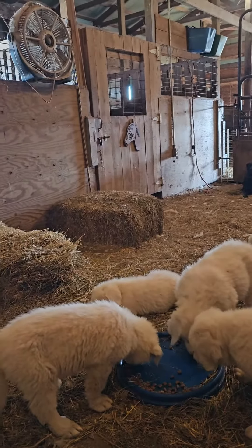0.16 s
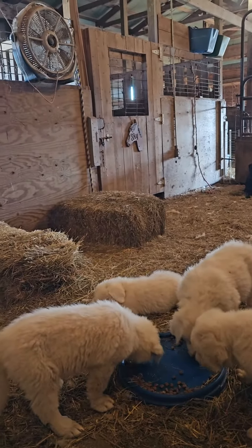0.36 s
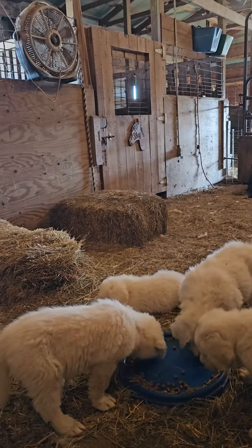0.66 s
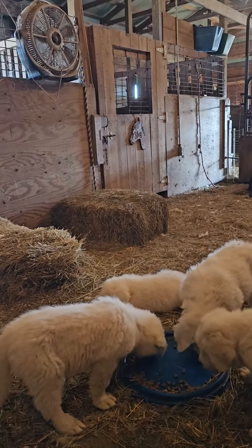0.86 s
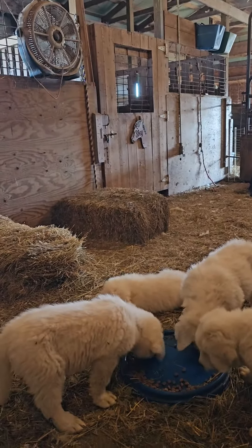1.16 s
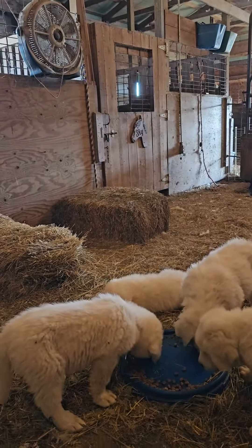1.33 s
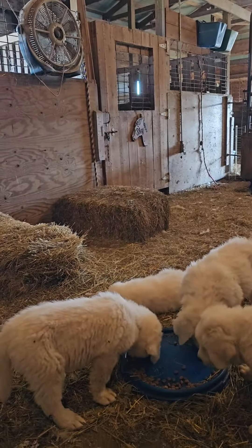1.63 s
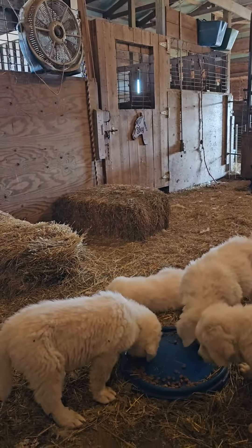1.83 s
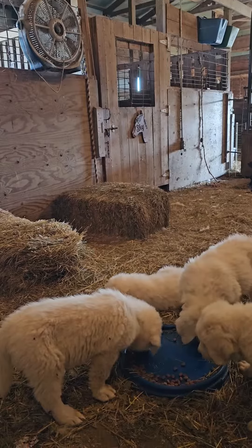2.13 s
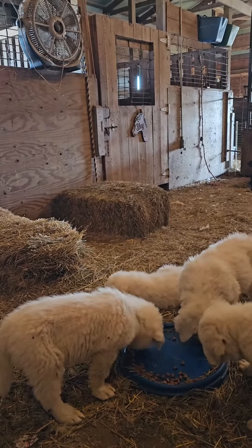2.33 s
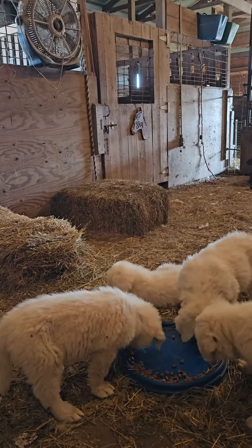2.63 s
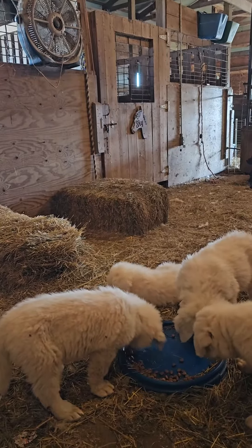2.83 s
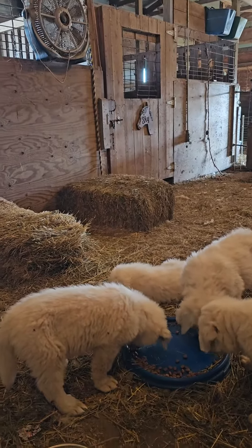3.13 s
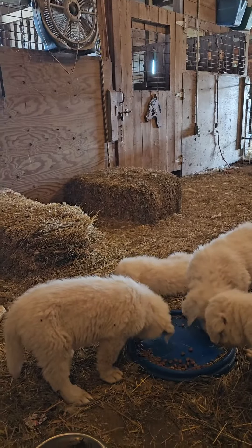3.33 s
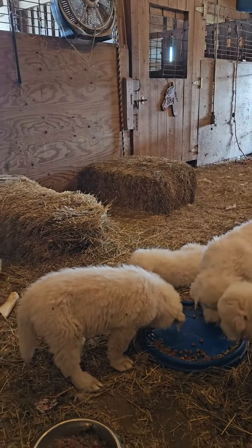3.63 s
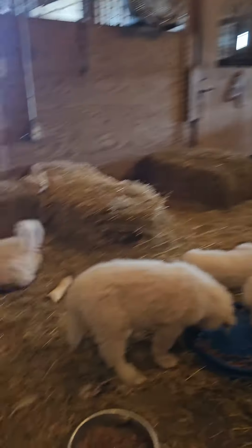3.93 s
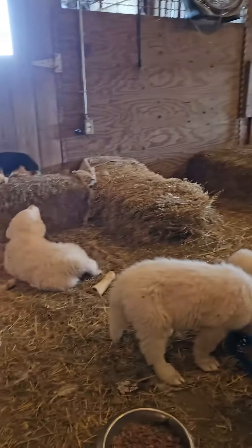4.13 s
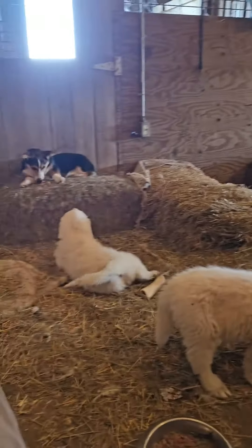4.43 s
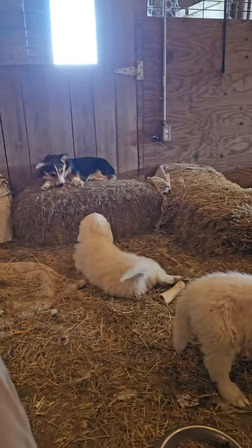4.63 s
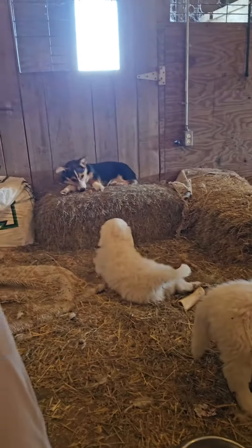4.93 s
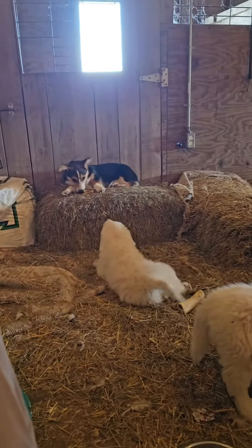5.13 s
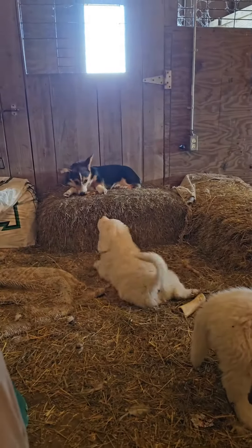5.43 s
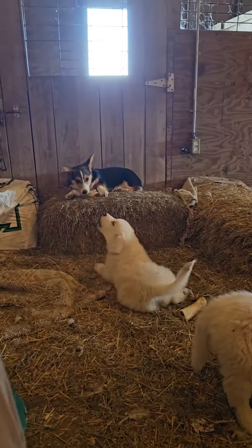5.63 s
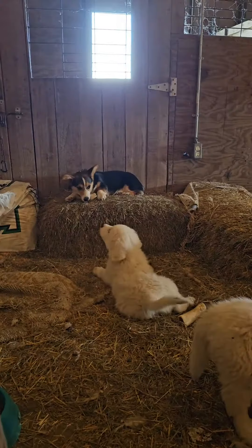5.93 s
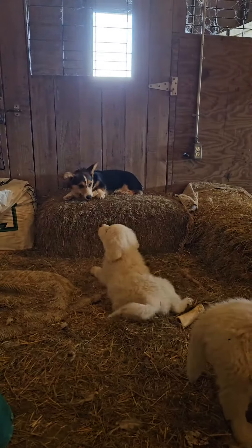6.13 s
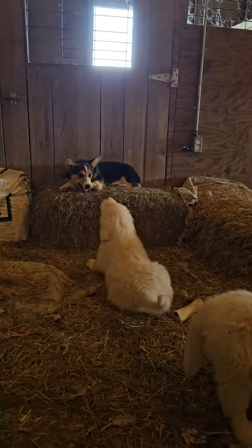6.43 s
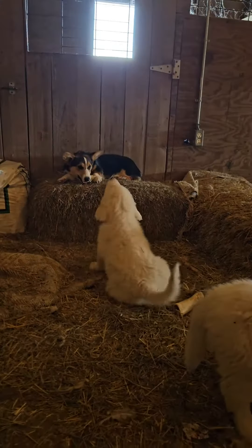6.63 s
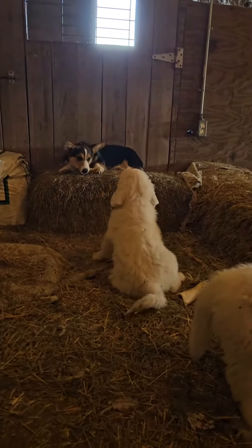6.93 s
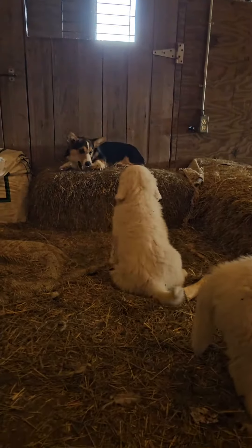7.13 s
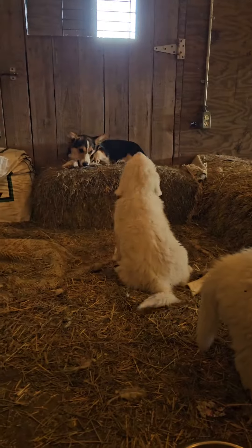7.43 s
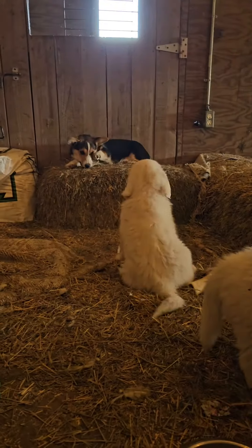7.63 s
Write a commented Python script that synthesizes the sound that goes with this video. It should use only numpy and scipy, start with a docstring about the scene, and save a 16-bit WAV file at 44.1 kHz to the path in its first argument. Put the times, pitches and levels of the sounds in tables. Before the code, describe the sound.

Inside a wooden barn, quiet low rumble and hiss with soft straw rustling and kibble ticking in a plastic pan. A puppy gives two weak, hoarse barks with little grunts, then a low growl and a slower grumble. Later it yaps loudly: a quick pair, another quick pair, then a single last yap. Handheld microphone near the feeding pups, the barking puppy across the pen, with short woody echoes.

```python
"""A puppy in a wooden barn gives two hoarse barks, grunts and growls, then yaps five times at a dog on a hay bale.
Each bark is an arch of pitch: harmonics and breathy air, with strong-weak beats of the folds near the top.
Grunts and growls are uneven pulse trains through chest, throat and mouth.
Litter mates' kibble rings a plastic pan; soft low bumps, scuffs and rustling straw are filtered noise.
Scattered echoes give the barn, over a low rumble and hiss, with a brief extra rumble near the start."""
import sys
import numpy as np
from scipy import signal
from scipy.fft import rfft, irfft, next_fast_len
from scipy.io import wavfile
from scipy.ndimage import uniform_filter1d, minimum_filter1d

SR = 44100
rng = np.random.default_rng(int(sys.argv[2]) if len(sys.argv) > 2 else 0)


def store_pcm(level_fs):
    """Save levels as 16-bit WAV."""
    pcm = np.round(np.clip(level_fs, -1, 1) * 32767).astype(np.int16)
    wavfile.write(sys.argv[1], SR, np.atleast_2d(pcm).T)


N = 342657
TIME = np.arange(N) / SR

# Hoarse barks: (top of arch [s], rise [s], fall [s], top pitch [Hz], level [dB], jaw gape [dB],
# jaws part before top [s], folds break at [s], beating width [s], beat strength [dB],
# change of fundamental in the break [dB], period jitter at 800 Hz [fraction], left minus right [dB])
HOARSE_BARK_EVENTS = [ (1.238, .09, 0.053, 636, -30, 5, 0.071, 1.19, 0.032, -6, -8.5, 0.00776, 1),
                      (2.284, .074, 0.081, 561.3, -32, 2.5, 0.044, 2.255, .07, -2.5, 7.5, 0.00814, 2)]
# Yaps: (top of arch [s], rise [s], fall [s], top pitch [Hz], level [dB], jaw gape [dB],
# jaws part before top [s], folds break at [s], beating width [s], beat strength [dB],
# change of fundamental in the break [dB], period jitter at 800 Hz [fraction], left minus right [dB])
YAP_EVENTS = [ (5.355, .099, .07, 856, -16, 14.5, 0.095, 5.354, 0.027, -1.5, -7.5, 0.0067, 1),
              (5.702, 0.094, .1, 818.3, -15.5, 8.5, 0.075, 5.699, 0.081, -3, 2.5, 0.0054, .3),
              (6.488, .1, .085, 779.2, -18.5, 12, 0.098, 6.486, .03, -4.5, -13.5, .011, -.9),
              (6.759, .083, .12, 828.3, -18.5, 5.5, 0.089, 6.748, 0.058, 6, 1.5, 0.0056, -0.5),
              (7.455, .09, .08, 863, -14.5, 7, 0.088, 7.46, 0.032, -2, -10, .004, -.3)]
# Throat colour of each hoarse bark, one curve per bark: (frequency [Hz], level [dB])
HOARSE_THROAT_CURVES = [
    [(70, -26), (150, 1.5), (550, 0.5), (800, 5), (1280, 2), (1480, -25), (1900, -6.5), (2100, -10.5),
     (3050, -8.5), (4400, -29), (5900, -56), (8300, -44.5), (10000, -53), (12500, -39), (15500, -73)],
    [(70, -35), (150, 5), (550, -7), (880, 3), (1280, -6), (1500, -4.5), (1920, 3.5), (2700, -4.5),
     (3200, -8.5), (4200, -18.5), (5900, -48.5), (8300, -37.5), (10000, -52), (12500, -22.5), (15500, -62)],
]
# Rounder throat colour shared by the yaps: (frequency [Hz], level [dB])
YAP_THROAT_CURVE = [(70, -33.5), (180, 0.5), (450, -7.5), (620, -6), (790, 2.5), (1020, -17), (1250, -6),
                    (1650, -10.5), (2250, -15), (2900, -30), (4000, -39.5), (6000, -63.5), (8000, -51),
                    (10000, -60.5), (12200, -47), (15500, -81)]
# Voice settings by name: swell [power of arch], *_db [dB], *_s [s], flutter [share], rasp_slope_db [dB]
HOARSE_SETTINGS = dict(swell=1, surge_db=0, shut_db=-24, lead_s=0.024, opening_s=0.1, closing_s=0.069, lips_db=3.5, flutter=0.44, rasp_db=-5.5, rasp_slope_db=-1)
YAP_SETTINGS = dict(swell=1.536, surge_db=10.5, shut_db=-19.5, lead_s=0.057, opening_s=0.059, closing_s=0.05, lips_db=3, flutter=0.2, rasp_db=-25, rasp_slope_db=15)
# Lines between the harmonics: (multiple of the pitch [ratio], level [dB])
HALF_LINE_LEVELS = [(1.5, 9), (2.5, 7.5), (5.5, -3)]
# How much of the jaw movement reaches each overtone: (frequency [Hz], share [0-1])
JAW_SHARE_CURVE = [(1250, 0.16), (1550, 0.6), (2300, 1), (4500, 0.7), (7000, 0.11)]
# Growls and grunts: (start [s], length [s], attack [s], level [dB], pulse rate [1/s], unevenness [0-1],
# first mouth resonance [Hz], closed mouth resonance [Hz], mouth relative level [dB])
GROWL_EVENTS = [ (1.08, 0.063, 0.042, -37, 160, 0.19, 1000, 1000, -20),
                (1.515, 0.044, 0.0084, -41.5, 156, 0.18, 1170, 1090, -21),
                (1.589, 0.1, 0.01, -35.5, 155, .08, 1020, 1010, -25),
                (2.209, 0.047, 0.011, -41, 150, 0.17, 940, 950, 13.5),
                (2.775, 0.27, 0.1, -26.5, 122, .19, 1260, 710, -10),
                (3.035, .24, 0.027, -34.5, 40, .2, 720, 750, -24),
                (3.766, 0.365, .065, -31, 84, .09, 1194, 865, -12),
                (5.497, 0.14, 0.018, -36.5, 174, 0.12, 806, 848, -32),
                (6.59, 0.078, .02, -42, 160, 0.17, 820, 800, -17)]
# Chest boom of the growls: (frequency [Hz], level [dB])
CHEST_CURVE = [(60, -24.5), (100, -23.5), (125, 3.5), (155, -1.5), (200, -4), (255, -9), (340, -10),
               (480, -16.5), (620, -25), (1000, -31), (2000, -36), (4000, -41), (8000, -51.5)]
# Kibble knocks: (time [s], level before KIBBLE_LIFT_DB [dB], favoured mode before detuning [Hz])
KIBBLE_EVENTS = [(1.454, -44, 1270), (1.496, -40, 1080), (1.527, -42, 1100), (2.056, -40.5, 1040),
                 (2.182, -45, 880), (3.288, -37, 853), (3.33, -32, 1416), (3.546, -39.5, 1290),
                 (3.643, -46, 1480), (3.663, -38, 810), (4.481, -44.5, 900)]
# Plastic pan: (mode before detuning [Hz], level before the spot boost [dB], 60 dB decay [s])
PAN_MODE_TABLE = [(640, -0.5, 0.026), (917, 3.5, 0.045), (1140, 3.5, 0.031), (1505, -3.5, 0.066),
                  (1690, -2, 0.065), (3220, -4, 0.013)]
# Soft low bumps; from the third on they are paws landing: (time [s], dry peak level [dB])
BUMP_EVENTS = [(.292, -44), (.521, -49), (2.7, -45), (3.71, -44), (6.085, -43), (6.1, -44), (6.547, -22),
               (6.935, -34), (7.138, -42)]
# Paw scuffs: (time [s], length [s], dry level [dB], centre frequency [Hz])
SCUFF_EVENTS = [(5.023, 0.055, -47.5, 3410)]
# Straws snapping close by: (time [s], dry peak level [dB])
SNAP_EVENTS = [(3.541, -43), (3.584, -35.5), (5.8596, -44.5), (6.0018, -44.5), (6.037, -45), (6.071, -38.5),
               (6.3577, -36)]
# Snap colour: (frequency [Hz], level [dB])
SNAP_CURVE = [(200, -3.5), (1500, 3), (5500, -1), (7000, -20.5), (10000, -36), (15000, -25.5)]
# Puppies shifting in the straw: (loudest at [s], swell [s], fade [s], level before the overall lift [dB],
# fizz relative to body [dB], left minus right [dB])
RUSTLE_EVENTS = [ (.11, 0.076, 0.069, -53, -1, -3), (.38, 0.2, 0.27, -62, 0, -1),
                 (1.68, 0.17, 0.092, -57.5, 3, -0.5), (2.079, .06, 0.2, -61, 6, -3),
                 (2.89, 0.068, 0.087, -52, 1, 0), (3.28, 0.13, 0.2, -62.5, 8, -6.5),
                 (3.982, 0.2, 0.15, -48, -2.5, -5), (4.3, 0.073, 0.11, -56.5, 9.5, -4),
                 (4.76, 0.15, 0.12, -44.5, -7, -7.5), (5.198, 0.28, .2, -50, -7, 0),
                 (6.112, 0.016, .04, -59, -3, -10), (7.169, 0.33, 0.33, -51.5, -4, -7.5)]
# Straw colour: (frequency [Hz], level [dB])
STRAW_CURVE = [(180, -32.5), (300, -5.5), (535, 0), (821, -0.5), (1090, -3), (1200, 1), (1670, -5),
               (1910, -3), (4070, -1.5), (7370, -19), (9290, -34.5), (11700, -19.5), (15500, -34)]
# Background colour: (frequency [Hz], level [dB])
FLOOR_CURVE = [(15, -32), (25, -11.5), (71, -3.5), (359, -13), (410, -27.5), (523, -19.5), (567, -18),
               (631, -19.5), (2010, -26.5), (7500, -43), (9300, -59.5), (15500, -38)]
# Barn echo decay: (frequency [Hz], 60 dB decay [s])
BARN_DECAY = [(150, 0.3), (400, 0.63), (800, 0.51), (1300, 0.41), (2800, 0.41), (7300, 0.42)]

EDGE_HZ = 15700  # top of the audible band
SLACK_HZ = 151.4  # pitch of the folds at rest
BREAK_S = 0.0016  # how fast the folds slip into strong-weak beats
SURGE_LEAD_S, SURGE_S = 0.024, 0.021  # the fundamental surges ahead of the break
PARTING_S, MUFFLED_DB = 0.0077, -20.5  # how fast the jaws part, and how dull the voice is until then
LIPS_SHUT_HZ, LIPS_OPEN_HZ, LIPS_WIDTH_HZ = 810, 1310, 150
GROWL_ONSET_DB, GROWL_SAG_DB_PER_S = -10.5, -18  # a growl swells from here, then sags
MOUTH_CLOSES_AFTER_S, MOUTH_CLOSING_S = 0.092, 0.011
MOUTH_WIDTHS_HZ = 280, 600
GROWL_LOW_CUT_HZ = 120
KIBBLE_LIFT_DB = 2
SPOT_DB, SPOT_OCTAVES = 23, 0.096  # the spot that is hit favours the modes near one pitch
RESTING_STRAW_DB = -69.5  # before the overall lift
CRACKS_PER_S, CRACK_SHARE = 500, 0.55
FLOOR_DB, FLOOR_DRIFT_DB = -57, 2.5
BRIEF_RUMBLE_S, BRIEF_RUMBLE_DB, BRIEF_RUMBLE_WIDTH_S = 0.4, 3.5, 0.13  # a brief extra low rumble


def amp(db):
    """Decibels to gain."""
    return 10 ** (np.asarray(db) / 20)


def unit(x):
    """Scales to rms 1."""
    return x / np.sqrt(np.mean(x ** 2) + 1e-20)


def read(points, hz):
    """Reads a curve on a log-frequency axis."""
    f, value = np.transpose(points)
    return np.interp(np.log(hz + 1), np.log(f + 1), value)


def colour(x, points):
    """Equalises a sound by a curve of (frequency [Hz], level [dB])."""
    n = next_fast_len(x.shape[-1] + 2048)
    gain = amp(read(points, np.fft.rfftfreq(n, 1 / SR)))
    return irfft(rfft(x, n) * gain, n)[..., :x.shape[-1]]


def wobble(n, hz):
    """Smooth random motion of rms 1 up to the given rate."""
    lowpass = signal.butter(2, hz, fs=SR, output="sos")
    return unit(signal.sosfilt(lowpass, rng.standard_normal(n + 4096))[-n:])


def resonate(x, hz, width):
    """A resonance that follows the curve hz: shift to zero, smooth, shift back."""
    turn = np.exp(2j * np.pi * np.cumsum(hz * np.ones(len(x))) / SR)
    r = np.exp(-np.pi * width / SR)
    return 2 * (turn * signal.lfilter([1 - r], [1, -r], x / turn)).real


def hump(t, rise_s, fall_s):
    """A bell of height 1 at t = 0, with its own width on each side."""
    return np.exp(-(t / np.where(t < 0, rise_s, fall_s)) ** 2)


def step(x):
    """A smooth step from 0 to 1 around x = 0."""
    return 0.5 + 0.5 * np.tanh(x / 2)


def add(mix, s, sound, pan_db=0):
    """Places a sound in the stereo mix, tilted between left and right."""
    part = mix[:, round(s * SR):][:, :sound.shape[-1]]
    part += (sound * amp([[pan_db / 2], [-pan_db / 2]]))[:, :part.shape[1]]


def bark(row, throat, swell, surge_db, shut_db, lead_s, opening_s, closing_s, lips_db, flutter,
         rasp_db, rasp_slope_db):
    """One arch of effort drives pitch, loudness and lips; harmonics, half lines and pulsing air pass the throat."""
    (top_s, rise_s, fall_s, top_hz, level_db, gape_db, parting_lead_s,
     break_s, beating_s, beat_db, lost_db, jitter, pan_db) = row
    t = np.arange(top_s - 0.18, top_s + 0.22, 1 / SR)
    arch = hump(t - top_s, rise_s, fall_s)
    hz = SLACK_HZ + (top_hz - SLACK_HZ) * arch

    # slack folds at low pitch beat less evenly
    unevenness = jitter * (800 / np.maximum(hz, 300)) ** 3
    turns = np.cumsum(hz * (1 + unevenness * wobble(len(t), 300))) / SR
    k = np.arange(2, 41)[:, None] / 2  # harmonics and the half lines between them
    line_hz = k * hz

    # near the top the folds break into strong-weak beats: lines grow between the harmonics
    broken = step((t - break_s) / BREAK_S)
    beats = broken * np.exp(-((t - break_s) / beating_s) ** 2) * amp(beat_db)
    weight = np.where(k % 1, beats * amp(read(HALF_LINE_LEVELS, k)), 1) * (line_hz < EDGE_HZ)
    # the fundamental can surge before the break, and shifts in level after it
    surge = surge_db * hump(t - break_s + SURGE_LEAD_S, SURGE_S, SURGE_S)
    weight[0] *= amp(surge + lost_db * broken * arch ** 2)

    # the jaws are widest a little before the top; the upper resonances dull as they close
    jaw_db = gape_db + shut_db * (1 - hump(t - top_s + lead_s, opening_s, closing_s))
    jaw_db = jaw_db + MUFFLED_DB * step((top_s - parting_lead_s - t) / PARTING_S)
    # the lip resonance rises and falls with the arch
    lips_hz = LIPS_SHUT_HZ + (LIPS_OPEN_HZ - LIPS_SHUT_HZ) * arch
    lip_peak_db = lips_db * np.exp(-((line_hz - lips_hz) / LIPS_WIDTH_HZ) ** 2)
    shape_db = read(throat, line_hz) + lip_peak_db + jaw_db * read(JAW_SHARE_CURVE, line_hz)

    # the voice starts and ends as a dark low hum
    slack = np.clip(2 - hz / 170, 0, 1)
    gain = weight * amp(shape_db - 33 * slack * np.log2(k))
    shimmer = 1 + flutter * np.array([wobble(len(t), 42) for _ in k])
    gain = gain * shimmer ** (k > 1.5)  # only above the first half line
    folds = (gain * np.cos(2 * np.pi * (k * turns + rng.random(k.shape)))).sum(0)

    # breath pulses with the folds, and its bright part follows the jaws
    air = colour(rng.standard_normal(len(t)) * (1 + 0.16 * np.cos(2 * np.pi * turns)), throat)
    hiss = colour(air, [(900, -17.5), (2500, 7)]) * amp(rasp_slope_db + jaw_db)
    voice = np.sqrt(2) * (folds + amp(rasp_db) * (1 - slack) * (air + hiss))
    loudness = amp(level_db) * arch ** swell * signal.windows.tukey(len(t), 0.05)
    return t[0], voice * loudness, pan_db


def growl(start, length, attack_s, level_db, hz, uneven, open_hz, closed_hz, mouth_db):
    """Slow uneven pulses boom in the chest and ring the throat and the closing mouth."""
    t = np.arange(0, length, 1 / SR)
    onset_db = GROWL_ONSET_DB * np.maximum(1 - t / attack_s, 0)
    sag_db = GROWL_SAG_DB_PER_S * np.maximum(t - attack_s, 0)
    effort_db = level_db + onset_db + sag_db
    mouth_hz = open_hz + (closed_hz - open_hz) * step((t - MOUTH_CLOSES_AFTER_S) / MOUTH_CLOSING_S)

    # pulses of uneven timing and size, with breath fading after each
    turns = np.cumsum(hz * np.exp(1.4 * uneven * wobble(SR, 70)[:len(t)])) / SR
    size, air = rng.standard_normal((2, SR))[:, :len(t)]
    pulses = np.diff(np.floor(turns), prepend=0) * np.exp(uneven * size)
    pulses = signal.lfilter([1], [1, -np.exp(-2 * np.pi * 1500 / SR)], pulses)  # soften above 1500 Hz
    breath = (0.3 + 2.5 * uneven) * air * np.exp(-(turns % 1) / 0.7)
    drive = unit(pulses) + breath

    mouth = resonate(resonate(drive, mouth_hz, MOUTH_WIDTHS_HZ[0]), mouth_hz, MOUTH_WIDTHS_HZ[1])
    # the throat speaks up steeply as the growl swells
    throat = unit(resonate(resonate(drive, 387, 84), 480, 160)) * amp(-0.5 + 4.3 * (effort_db + 26))
    # the higher grunts through a shut mouth are nearly a plain hum
    shut = np.clip((hz - 132) / 12, 0, 1)
    hum = np.cos(2 * np.pi * turns)
    chest = (1 - 0.4 * shut) * unit(colour(drive, CHEST_CURVE)) + 0.7 * shut * hum

    voice = chest + throat + amp(mouth_db) * unit(mouth)
    voice = voice * amp(effort_db) * signal.windows.tukey(len(t), 0.2)
    low_cut = signal.butter(N=4, Wn=GROWL_LOW_CUT_HZ, btype="high", fs=SR, output="sos")
    return start, signal.sosfilt(low_cut, voice)


def kibble(level_db, spot_hz):
    """A pellet rings the plastic pan's decaying modes, differently at each spot, with a short crunch."""
    t = np.arange(5000) / SR
    ring = np.zeros(len(t))
    for hz, db, t60 in PAN_MODE_TABLE:
        spot_db = SPOT_DB * np.exp(-(np.log2(hz / spot_hz) / SPOT_OCTAVES) ** 2)
        detune = rng.uniform(0.92, 0.95)  # each mode sounds 5-8 % below the table
        ring += amp(db + spot_db - 60 * t / t60) * np.sin(2 * np.pi * hz * detune * t)
    crunch = amp(-60 * t / 0.077) * unit(colour(rng.standard_normal(len(t)), STRAW_CURVE))
    knock = unit(ring) + crunch
    return amp(level_db + KIBBLE_LIFT_DB) * knock / abs(knock).max()


def burst(peak_db, t60, points):
    """A dull or sharp impact with no ring: coloured noise with a quick rise and decay."""
    t = np.arange(3000) / SR
    rise = 1 - np.exp(-(12 * t / t60) ** 2)
    hit = colour(rng.standard_normal(len(t)), points) * amp(-60 * t / t60) * rise
    return amp(peak_db) * hit / abs(hit).max()


def scuff(length, level_db, hz):
    """A paw drags over stalks: a short band of hiss."""
    t = np.arange(0, length, 1 / SR)
    hiss = resonate(resonate(rng.standard_normal(len(t)), hz, 720), hz, 720)
    return amp(level_db) * unit(hiss * np.minimum(t / 0.0062, 1) * (1 - t / length))


def stalks():
    """Countless stalks rub as steady noise and crackle as random clicks."""
    size = amp(4.5 * np.minimum(rng.exponential(1, N), 3.5))
    cracks = rng.standard_normal((2, N)) * (rng.random(N) < CRACKS_PER_S / SR) * size
    rub = unit(rng.standard_normal((2, N)))
    return unit(colour(rub + CRACK_SHARE * unit(cracks), STRAW_CURVE))


def straw():
    """Each shift of a puppy swells and fades in the straw, with more or less fizz on top."""
    body_power, fizz_power = np.full((2, 2, N), amp(RESTING_STRAW_DB) ** 2)
    for s, swell_s, fade_s, level_db, fizz_db, pan_db in RUSTLE_EVENTS:
        push = np.exp(-abs(TIME - s) / np.where(TIME < s, swell_s, fade_s))
        power = (push * amp([[level_db + pan_db / 2], [level_db - pan_db / 2]])) ** 2
        body_power = body_power + power
        fizz_power = fizz_power + power * amp(fizz_db) ** 2
    rustle = stalks()
    top = colour(rustle, [(6000, -40), (9500, 0)])
    moving = (rustle - top) * np.sqrt(body_power) + top * np.sqrt(fizz_power)
    return moving * amp(2.5 + 1.6 * wobble(N, 17))  # overall lift and flicker [dB]


def floor():
    """Low noise alike at both ears and separate hiss at each, drifting together in level."""
    # the steady low noise swells for a moment: a brief extra low rumble
    brief = np.exp(-((TIME - BRIEF_RUMBLE_S) / BRIEF_RUMBLE_WIDTH_S) ** 2)
    shared = rng.standard_normal(N) * amp(BRIEF_RUMBLE_DB * brief)
    low_noise = colour(shared, [(300, 3), (3000, -7.5)])
    hiss = colour(rng.standard_normal((2, N)), [(150, -8), (600, 1.5), (3000, 3.0)])
    drift = amp(FLOOR_DRIFT_DB * wobble(N, 1.5))
    return amp(FLOOR_DB) * unit(colour(low_noise + hiss, FLOOR_CURVE)) * drift


def barn(x, wet_db):
    """Scattered echoes from plank walls, each band dying at its own speed."""
    t = TIME[:SR]
    taps = rng.choice([-1., 1.], (2, SR)) * (rng.random((2, SR)) < 3000 / SR) * (t > 0.002)
    taps = taps * (1 + 2.03 * np.exp(-t / 0.026))  # the near wall and the floor answer first
    hz, frame_s, bands = signal.stft(taps, SR, nperseg=256)
    # low echoes are more alike at the two ears
    same = np.clip(read([(200, 0.97), (500, 0.4), (850, 0.4), (2000, 0)], hz), 0, 1)[:, None]
    bands[1] = same * bands[0] + np.sqrt(1 - same ** 2) * bands[1]
    decay = amp(-60 * frame_s / read(BARN_DECAY, hz)[:, None])
    tail = signal.istft(bands * decay, SR, nperseg=256)[1]
    tail = colour(tail / np.linalg.norm(tail[0]), [(400, 3.5), (800, 0.41), (1500, 3.2), (3000, 5.0)])
    return x + amp(wet_db) * signal.fftconvolve(x, tail, axes=1)[:, :N]


def scene():
    """The puppy across the pen, the feeding and the straw nearer by, over the background."""
    hoarse, yaps, growls, near, snaps = np.zeros((5, 2, N))
    for row, throat in zip(HOARSE_BARK_EVENTS, HOARSE_THROAT_CURVES):
        add(hoarse, *bark(row, throat, **HOARSE_SETTINGS))
    for row in YAP_EVENTS:
        add(yaps, *bark(row, YAP_THROAT_CURVE, **YAP_SETTINGS))
    for row in GROWL_EVENTS:
        add(growls, *growl(*row))
    for s, level_db, spot_hz in KIBBLE_EVENTS:
        add(near, s, kibble(level_db, spot_hz))
    bump_curve = [(60, -17.0), (200, 17), (800, 5.5), (2500, -31.5), (8000, -47.5)]
    for s, peak_db in BUMP_EVENTS:
        add(near, s, burst(peak_db, t60=0.019, points=bump_curve))
    for s, length, level_db, hz in SCUFF_EVENTS:
        add(near, s, scuff(length, level_db, hz), pan_db=-3)
    for s, peak_db in SNAP_EVENTS:
        add(snaps, s, burst(peak_db, t60=0.012, points=SNAP_CURVE))

    puppy = barn(hoarse, wet_db=2.5) + barn(yaps, wet_db=0.0) + barn(growls, wet_db=-1.5)
    # each ear hears its own colour of the voice
    left = colour(puppy[0], [(900, -4.5), (1250, -8.5), (2200, -1.5), (3400, -6.0), (5000, -6.5),
                             (8000, 1.5), (10500, -19), (15000, -11.5)])
    right = colour(puppy[1], [(900, -5.0), (1250, -6), (2200, -3.5), (3400, 3.0), (5000, -2.5),
                              (8000, -13.5), (10500, -4.5), (15000, 3.5)])
    voice = np.array([left, right])
    return voice + barn(near, wet_db=-1) + barn(snaps, wet_db=-9.5) + straw() + floor()


def record(dry):
    """A quick limiter pulls down peaks above 0.92 of full scale; then a low-pass sets the band limit."""
    allowed = np.minimum(1, 0.92 / (abs(dry).max(0) + 1e-9))
    limited = dry * uniform_filter1d(minimum_filter1d(allowed, size=441), size=441)
    lowpass = signal.firwin(511, EDGE_HZ, window=("kaiser", 9), fs=SR)
    return signal.oaconvolve(limited, lowpass[None], "same")


dry = scene()
out = record(dry)
store_pcm(out)
```